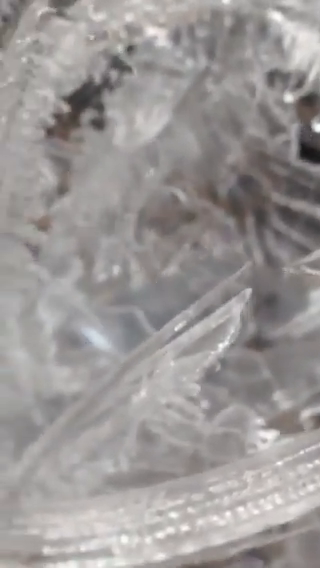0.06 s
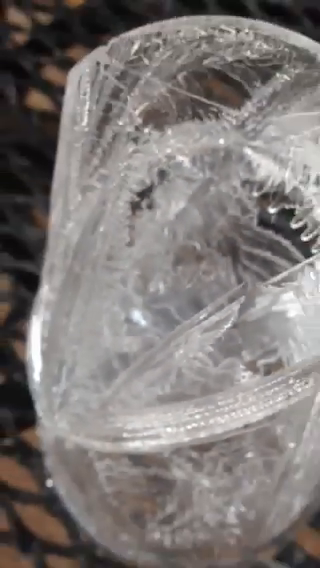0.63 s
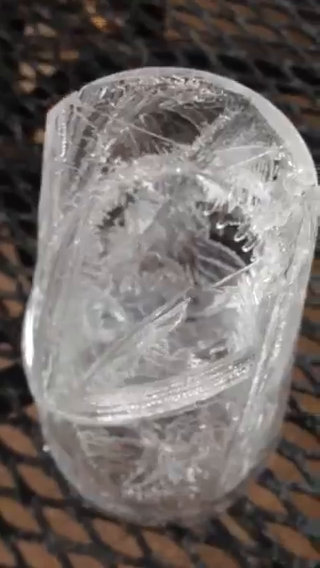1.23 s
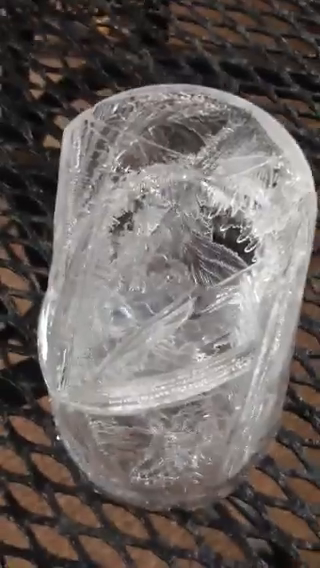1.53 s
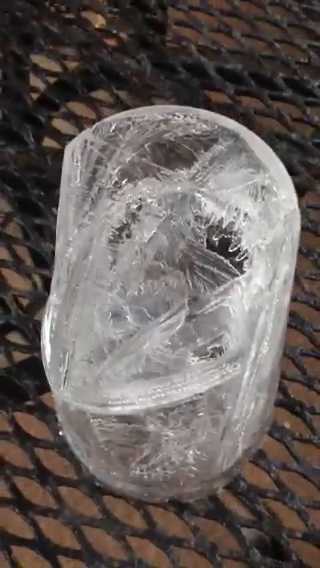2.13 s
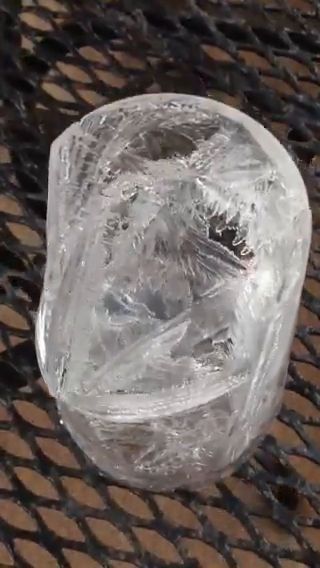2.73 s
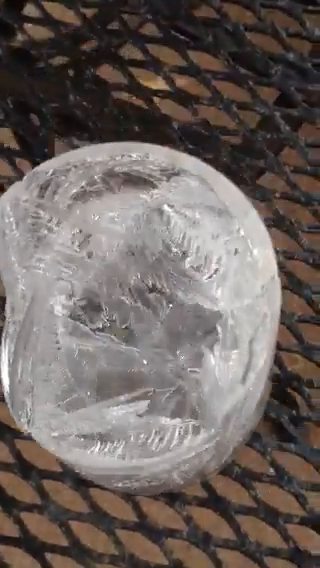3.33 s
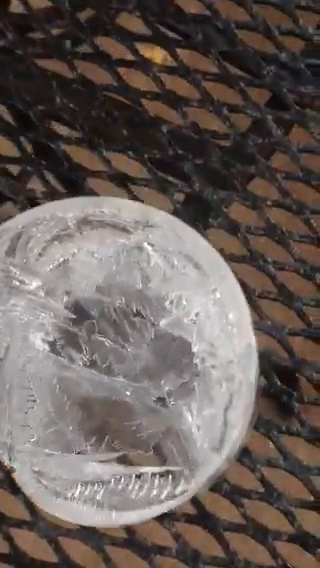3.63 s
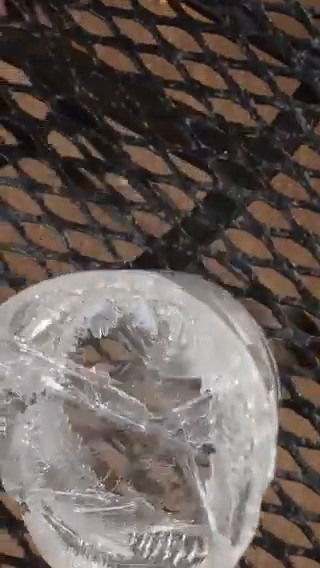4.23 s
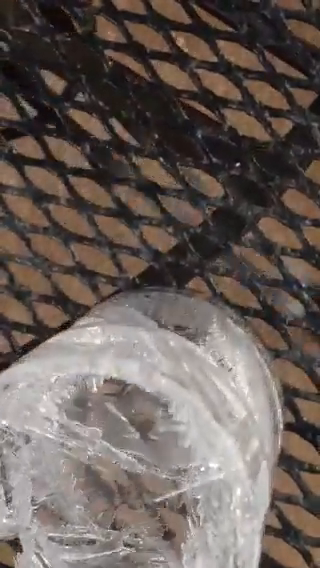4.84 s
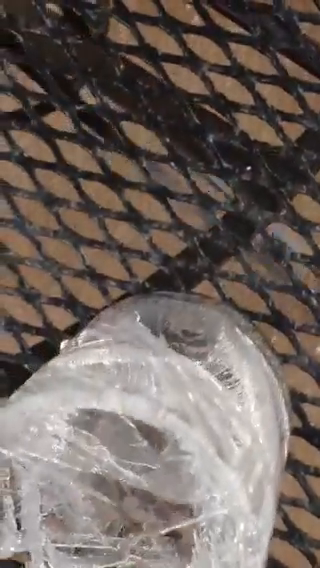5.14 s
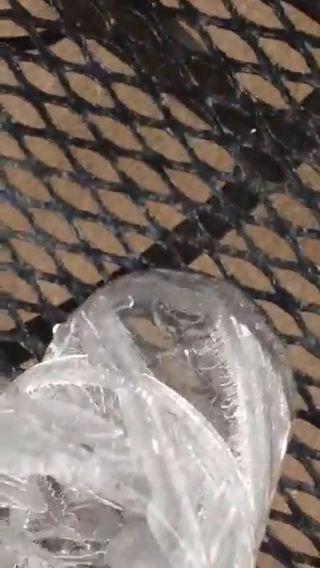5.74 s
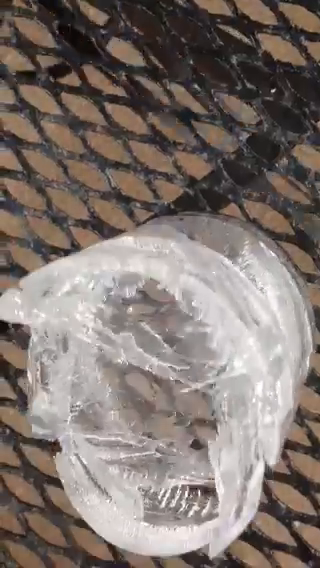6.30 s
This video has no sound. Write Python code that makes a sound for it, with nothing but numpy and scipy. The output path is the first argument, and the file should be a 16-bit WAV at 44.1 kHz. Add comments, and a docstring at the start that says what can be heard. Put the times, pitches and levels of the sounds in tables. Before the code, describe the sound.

In a quiet yard, a machine that is likely an air conditioner gives a steady low hum, with a softer fan drone and gently surging air. Distant traffic rumbles underneath with a light hiss. Faint birds peep and twitter throughout, and a closer one gives three thin rising chips. The hum sinks slightly as the microphone drifts, and the traffic swells a little near the end.

```python
"""A quiet yard, one microphone, near an outdoor machine that is likely an air conditioner.
Its motor hums at twice the mains frequency while its fan drones and beats against the hum;
both sink slowly as the microphone drifts. One small bird nearby gives thin rising chips;
others peep and twitter farther off, echoed by walls and trees. Far traffic and a soft
hiss of air lie underneath and swell a little as a vehicle passes."""
import sys
import numpy as np
from scipy import signal
from scipy.fft import rfft, irfft, next_fast_len
from scipy.io import wavfile
from scipy.ndimage import uniform_filter1d, map_coordinates

SR = 44100
rng = np.random.default_rng(int(sys.argv[2]) if len(sys.argv) > 2 else 0)


def dump_mix(stems):
    """Bounce the given channels to the path in sys.argv[1] as a 16-bit WAV at rate SR."""
    frames = np.atleast_2d(stems).T  # one column per channel
    limited = np.clip(frames, -1, 1)  # hard clip at full scale
    pcm = np.round(limited * 32767).astype(np.int16)
    wavfile.write(sys.argv[1], SR, pcm)


N = 280917
TIME = np.arange(N) / SR


# The motor's partials, heard from close by: multiple of the mains frequency
HUM_MULTIPLES = [2, 4, 6, 8, 10, 14, 16, 18, 20, 22, 24, 28, 34, 38]
# The same partials: level/dB against the strongest
HUM_LEVELS = [0, -41, -26, -35, -43, -39.5, -45.5, -46, -50, -52, -56, -51.5, -55, -54]

def motor(mains_hz, hum_db, waver_db, whine_hz, whine_db):
    """Magnetic hum locked to the mains, and a faint whine; moving air makes the higher partials waver."""
    hum = np.zeros(N)
    for multiple, db in zip(HUM_MULTIPLES, HUM_LEVELS):
        depth_db = waver_db * np.log(multiple / 2)
        hum += amp(db + depth_db * wobble(1.6)) * tone(np.full(N, multiple * mains_hz))
    whine = amp(whine_db + wobble(2.2)) * tone(whine_hz + wobble(3))
    return amp(hum_db) * microphone_drift() * hum + whine


# Resonances of the machine's casing: f/Hz, half width/Hz, relative level/dB
CASING_MODES = [(160.3, 9.6, -1.5), (185.6, 5.6, -2.5), (281, 7.4, -3.3), (321.7, 15.1, 1.5),
                (342, 16, -6.5), (368, 18, -3), (399, 14, -2), (503.3, 7.9, -1), (646.5, 21, -10.5),
                (1014.5, 19, -14.5)]

def fan(blade_hz, drone_db, flutter_db, air_db, surge_db, gust_db):
    """The blades drone at their passing rate and blow surging air through the ringing casing."""
    def casing(hz):
        powers = (amp(db) ** 2 / (1 + ((hz - centre) / width) ** 2) ** 2
                  for centre, width, db in CASING_MODES)
        return np.sqrt(sum(powers))

    drone = amp(drone_db + flutter_db * wobble(6.2)) * tone(blade_hz + .26 * wobble(5))
    crest_s, period_s = 3.28, 1.42
    flow_db = surge_db * np.cos(2 * np.pi * (TIME - crest_s) / period_s) + gust_db * wobble(4)
    air = amp(air_db + flow_db) * unit(filtered(rng.standard_normal(N), casing))
    return microphone_drift() * drone + air


# Faint low tones of the nearby machine: f/Hz, level/dB before the microphone drifts
LOW_MACHINE_TONES = [(46.4, -65.5), (58.2, -62), (95, -65), (156.8, -65), (181.4, -70), (202.6, -71)]

def low_tones():
    """Faint low tones wander a little in pitch under the hum, one where hum and fan drone mix."""
    tones = sum(amp(db) * tone(hz + .1 * wobble(2)) for hz, db in LOW_MACHINE_TONES)
    return microphone_drift() * tones


def microphone_drift(from_s=1.6, db_per_s=.5):
    """The machine's tones hold their level, then sink steadily as the microphone drifts."""
    return amp(-db_per_s * np.maximum(TIME - from_s, 0))


# The bird nearest the microphone: t/s, level/dB before the echo mix, length ratio, pitch ratio,
# held top/dB against the upsweep, lower side tone/dB against the main tone
NEAR_CHIPS = [(2.507, -60.3, 1, 1.01, -9, 3.5), (4.568, -67.5, 1.2, .975, .5, -3),
              (5.969, -65.7, 1.1, .995, -4.3, -4)]

def chips(low_hz, top_hz, beat_hz, upper_side_db):
    """Each chip sweeps up and holds its top, where a second vibration in the syrinx adds side tones."""
    # the contour of a chip, before each one is stretched and tuned
    length_s, attack_s, release_s = .076, .007, .016
    sweep_middle_s, sweep_ease_s, top_from_s, top_blend_s = .0165, .0055, .02, .006
    droop_from_s, droop_hz_per_s = .05, 17000
    out = np.zeros(N)
    for s, db, stretch, tune, top_db, side_db in NEAR_CHIPS:
        age = np.clip((TIME - s) / stretch, 0, length_s)
        sweep = 1 / (1 + np.exp((sweep_middle_s - age) / sweep_ease_s))
        droop = droop_hz_per_s * np.maximum(age - droop_from_s, 0)
        hz = tune * (low_hz + (top_hz - low_hz) * sweep - droop) * (1 + .013 * wobble(500))
        held = ramp((age - top_from_s) / top_blend_s)
        loudness = amp(db + top_db * held) * ramp(age / attack_s) * ramp((length_s - age) / release_s)
        # the side tones enter as the top is reached and fade as it droops
        side_gain = amp(side_db) * held * ramp(.5 + (droop_from_s - age) / release_s)
        sides = tone(hz - beat_hz) + amp(upper_side_db) * tone(hz + beat_hz)
        out += loudness * (tone(hz) + side_gain * sides)
    return out


# Birds at middle distance: t/s, length/s, start f/Hz, end f/Hz, level/dB before the echo mix
MIDDLE_PEEPS = [(0, .04, 4450, 4030, -70), (0.756, .11, 3990, 3700, -70.3), (1.15, .11, 3800, 3680, -68.8),
                (2.339, .06, 1670, 1616, -69.5), (2.378, .04, 4750, 4530, -72.5),
                (3.418, .04, 4560, 4100, -66.7), (3.839, .018, 6200, 7600, -67.5),
                (4.578, .024, 3510, 3620, -69.5), (4.645, .053, 4660, 4400, -71),
                (5.43, .11, 3870, 3680, -72.7)]

def peeps():
    """Other birds give single short, slurred calls."""
    return sum(whistle(*row) for row in MIDDLE_PEEPS)


def twitter(calls_per_s=7, mean_s=.03, centre_hz=3080, spread_hz=220, db=-77.5):
    """A far flock calls faintly, each call with its own moment, length, slide and strength."""
    out = np.zeros(N)
    for when, length, start, end, strength in rng.uniform(-1, 1, (int(calls_per_s * TIME[-1]), 5)):
        s = (when + 1) / 2 * TIME[-1]
        start_hz, end_hz = centre_hz + spread_hz * start, centre_hz + spread_hz * end
        out += whistle(s, mean_s * (1 + length / 2), start_hz, end_hz, db + 2 * strength)
    return out


def whistle(s, length_s, start_hz, end_hz, db):
    """A bird's soft whistle slides quickly and then settles on its last pitch."""
    first = int(s * SR)
    progress = np.arange(min(int(length_s * SR), N - first)) / (length_s * SR)
    quaver = map_coordinates(rng.standard_normal(64), [progress * length_s * 200])
    slide_hz = end_hz + (start_hz - end_hz) * (1 - progress) ** 1.5
    arch = np.sqrt(4 * progress * (1 - progress))
    note = amp(db) * arch * tone(slide_hz * (1 + .007 * quaver))
    return np.pad(note, (first, N - first - len(note)))


# The yard's echo at the microphone: f/Hz, time to fall by 60 dB (t/s)
YARD_DECAY = [(500, 1), (4000, 0.37), (10000, 0.26)]

def yard(x):
    """Walls and trees scatter echoes whose treble dies first."""
    hz, t, spectra = signal.stft(rng.standard_normal(SR // 2), SR, nperseg=256)
    decay = amp(-60 * t / along(YARD_DECAY, hz)[:, None])
    tail = signal.istft(spectra * decay, SR, nperseg=256)[1]
    return signal.fftconvolve(x, tail / np.linalg.norm(tail))[:N]


# Far roads as heard from the yard: f/Hz, relative level/dB per Hz
ROAD_SPECTRUM = [(15, -17), (30, -1), (58, 4), (105, 6.5), (145, 5), (230, -5.5), (330, -3), (450, -4),
                 (680, -7), (900, -13.5), (1050, -19.5), (1300, -19), (1800, -29), (4000, -71)]

def traffic(rumble_db, tyres_db, pass_db):
    """Far roads rumble evenly; the passing vehicle lifts the tyre noise above the bass."""
    roads = rush(ROAD_SPECTRUM, patchy_db=1.2)
    bass = filtered(roads, lambda hz: 1 / (1 + (hz / 430) ** 8))
    return amp(rumble_db) * bass + amp(tyres_db + pass_db * vehicle_nearness()) * (roads - bass)


def vehicle_nearness(nearest_s=5.97, half_duration_s=.86):
    """A far vehicle goes by: 1 at its nearest, falling away on either side."""
    return 1 / (1 + ((TIME - nearest_s) / half_duration_s) ** 2)


# Brief swells in the distance: crest t/s, half length/s, f/Hz, level/dB
RUMBLE_SWELLS = [(4.96, 0.068, 680, -60), (5.584, 0.034, 740, -62), (5.9, 0.061, 540, -60)]

def swells(width_hz):
    """Now and then one narrow band of the far rumble rises and sinks back."""
    out = np.zeros(N)
    for s, half_length, centre_hz, db in RUMBLE_SWELLS:
        band = filtered(rng.standard_normal(N), lambda hz: np.exp(-((hz - centre_hz) / width_hz) ** 2))
        out += amp(db) * np.exp(-((TIME - s) / half_length) ** 2 / 2) * unit(band)
    return out


# Open air all around the microphone: f/Hz, relative level/dB per Hz
AIR_SPECTRUM = [(500, -11.5), (1400, -3.5), (1750, -3), (2150, 1), (2750, -3), (3100, -0.5), (3700, -0.8),
                (4400, -1.5), (5500, -4.5), (7000, -7), (9000, -9), (12000, -10), (15500, -10)]

def air_hiss(db, pass_db):
    """A smooth hiss of air rises a little as the vehicle passes."""
    return amp(db + pass_db * vehicle_nearness()) * rush(AIR_SPECTRUM, patchy_db=.8)


def rush(spectrum, patchy_db):
    """Coloured noise of rms 1 with faint drifting patches."""
    spectra = signal.stft(rng.standard_normal(N), nperseg=512)[2]
    patches = uniform_filter1d(rng.standard_normal(spectra.shape), size=5, axis=0)
    patches = uniform_filter1d(patches, size=18, axis=1)
    noise = signal.istft(spectra * amp(patchy_db * unit(patches)), nperseg=512)[1][:N]
    return unit(filtered(noise, lambda hz: amp(along(spectrum, hz))))


def tone(hz):
    """A sine of rms 1 that follows a pitch given per sample."""
    return np.sqrt(2) * np.sin(2 * np.pi * (np.cumsum(hz) / SR + rng.random()))


def wobble(rate):
    """A smooth random curve, rate knots a second."""
    return map_coordinates(rng.standard_normal(int(N * rate / SR) + 4), [TIME * rate])


def filtered(x, response):
    """Shape x by a gain given as a function of frequency."""
    size = next_fast_len(N + SR // 2)
    return irfft(rfft(x, size) * response(np.fft.rfftfreq(size, 1 / SR)), size)[:N]


def along(points, hz):
    """Read (f/Hz, value) points on a log axis."""
    freqs, values = np.transpose(points)
    return np.interp(np.log(hz + 1), np.log(freqs), values)


def amp(db):
    """Decibels to gain."""
    return 10 ** (np.asarray(db) / 20)


def unit(x):
    """Scale to rms 1."""
    return x / np.sqrt(np.mean(x ** 2) + 1e-20)


def ramp(u):
    """Rise from 0 to 1 and stay there."""
    return np.clip(u, 0, 1)


def scene():
    """The machine in front, birds around it and traffic far behind, at one microphone."""
    machine = motor(mains_hz=60, hum_db=-35.5, waver_db=.6, whine_hz=1109.4, whine_db=-79)
    machine += fan(blade_hz=83.2, drone_db=-47.5, flutter_db=.05, air_db=-55, surge_db=1.3, gust_db=1.2)
    background = traffic(rumble_db=-53, tyres_db=-52.5, pass_db=1.5)
    background += air_hiss(db=-65, pass_db=1.3) + swells(width_hz=63)
    machine += low_tones()
    calls = chips(low_hz=4100, top_hz=8420, beat_hz=1800, upper_side_db=-8.5) + peeps()
    # chips and peeps arrive about as much by echo as directly; the far flock only by echo
    birds = amp(-1.5) * calls + yard(amp(-2.5) * calls + twitter())
    return (machine + birds + background)[None]


def record(dry):
    """The sound fades in and out over 4 ms so its ends do not click; the highest treble is cut off."""
    from_edge_s = np.minimum(TIME, TIME[-1] - TIME)
    ease = np.sin(np.pi / 2 * ramp(from_edge_s / .004)) ** 2
    return filtered(dry[0] * ease, lambda hz: hz < 15450)[None]


dry = scene()
out = record(dry)
dump_mix(out)
```